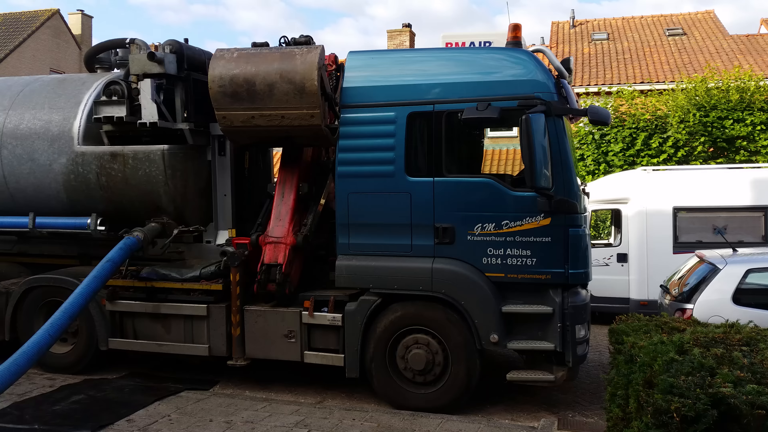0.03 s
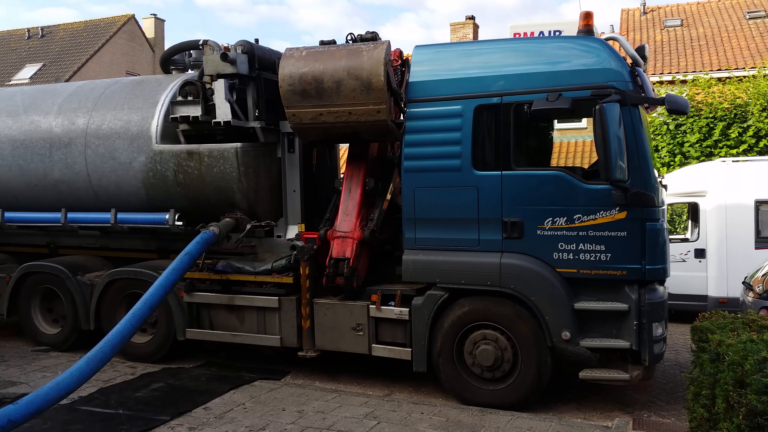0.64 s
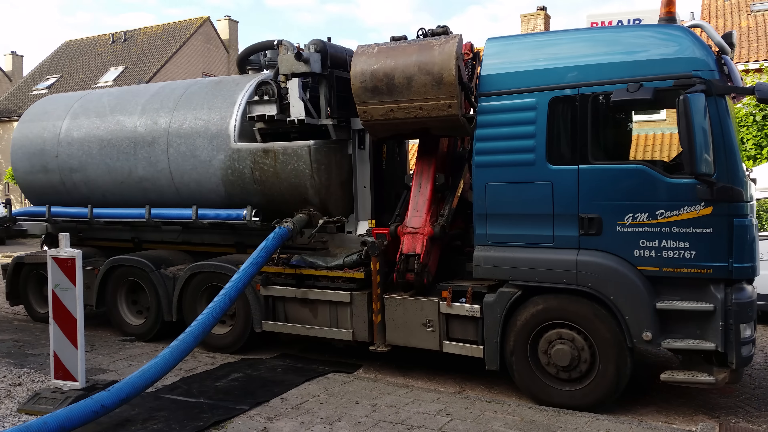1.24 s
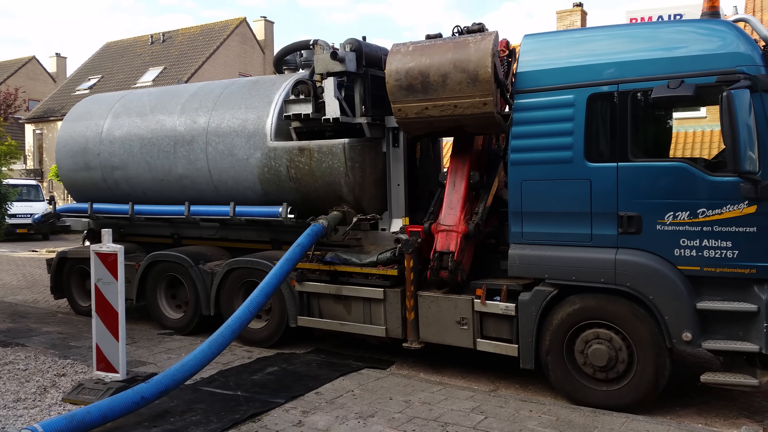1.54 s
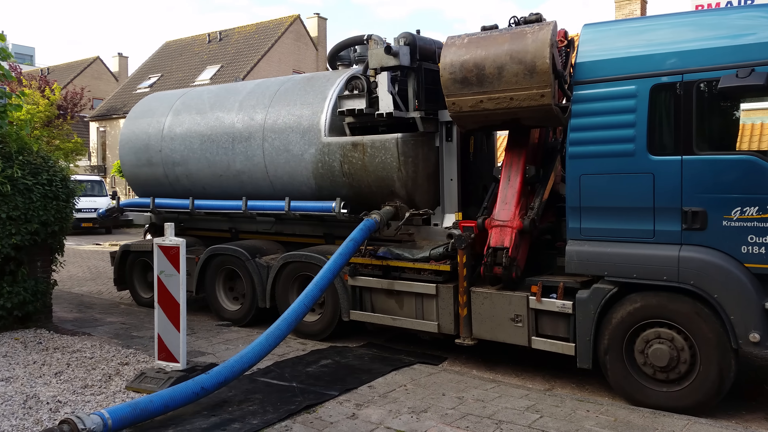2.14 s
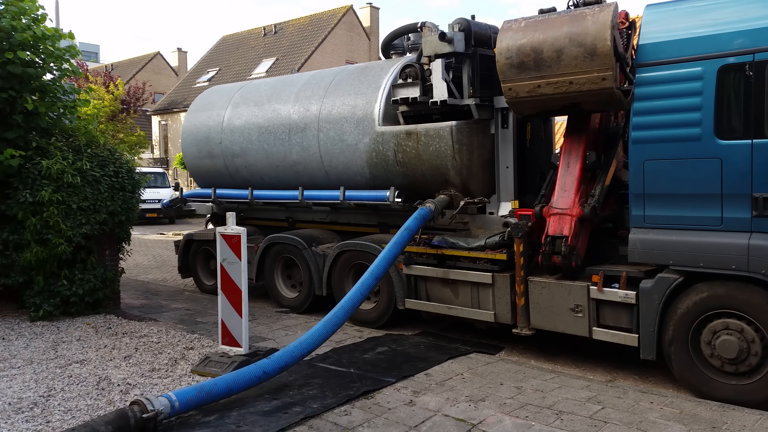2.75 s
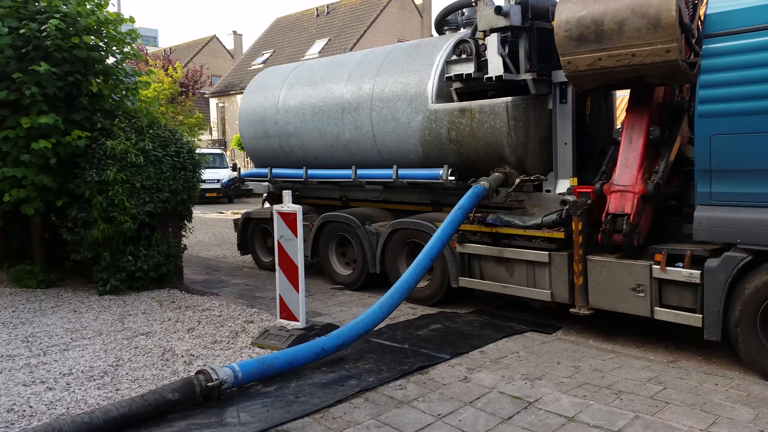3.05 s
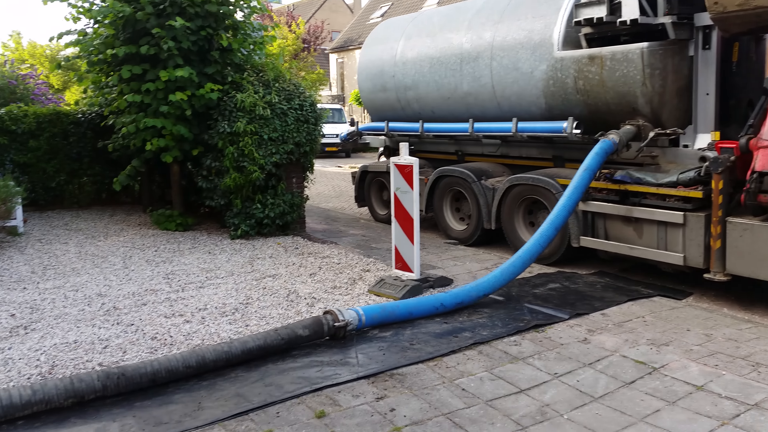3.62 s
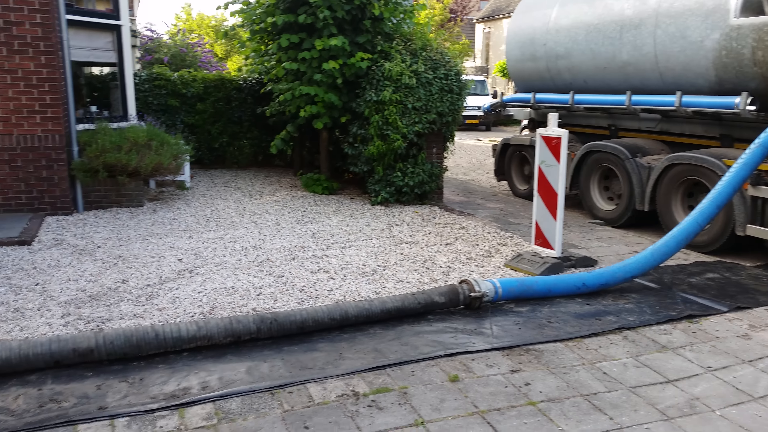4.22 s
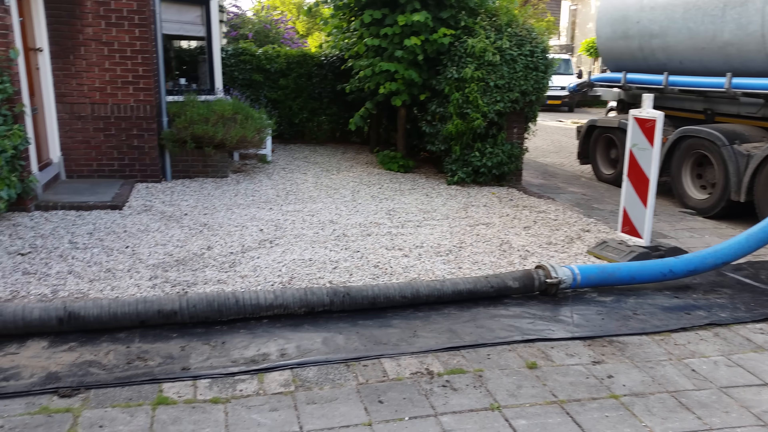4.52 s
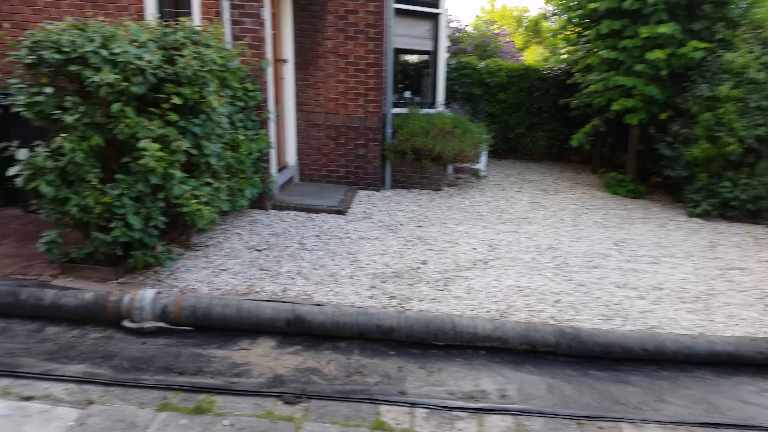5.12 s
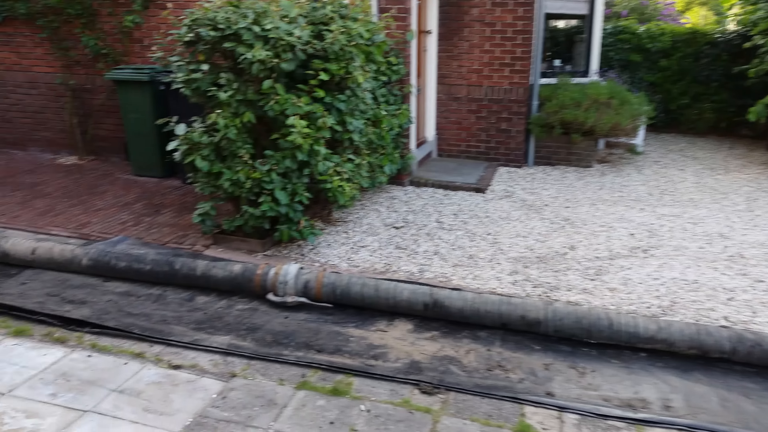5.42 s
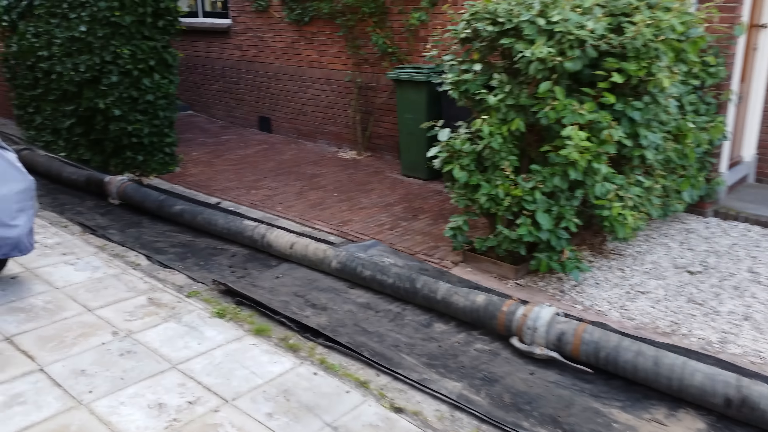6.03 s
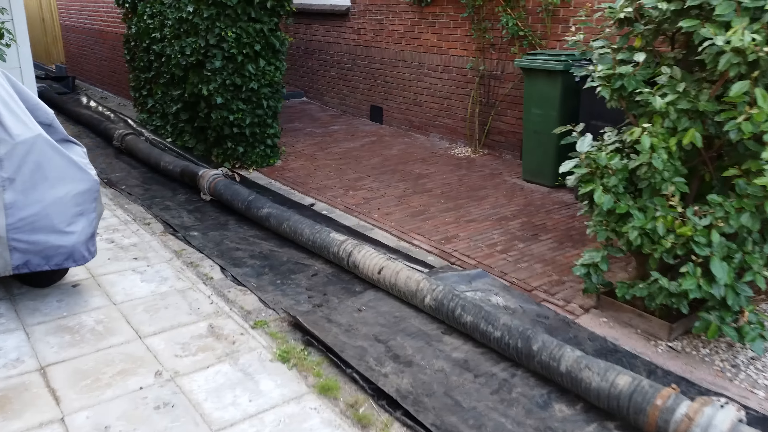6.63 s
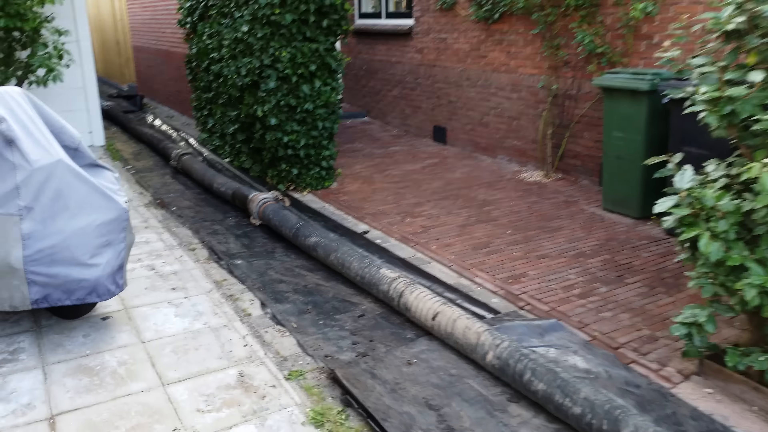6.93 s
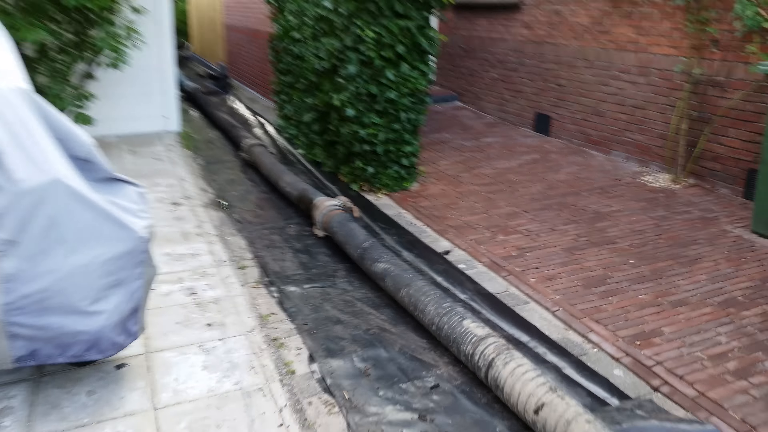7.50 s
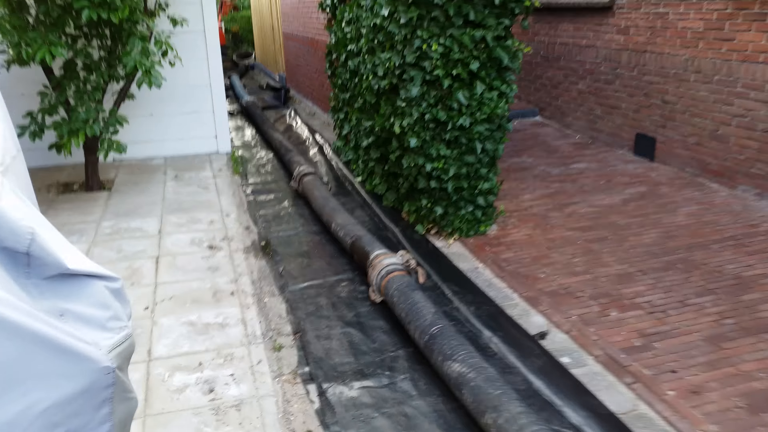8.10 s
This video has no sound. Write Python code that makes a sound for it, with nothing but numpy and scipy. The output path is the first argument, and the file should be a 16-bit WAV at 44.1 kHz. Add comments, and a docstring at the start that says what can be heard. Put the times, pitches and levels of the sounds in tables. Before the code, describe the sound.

A tanker truck's diesel engine and vacuum pump drone steadily in a street, with a throbbing hum, rushing air and faint whine.

```python
"""Vacuum tanker in a brick-lined street

A six-cylinder diesel, governed at working speed, drives a pump. Exhaust and pump radiate harmonics of
their cycles, which beat over a roar of air and clatter; crankshaft and blower whine, and grit hisses
in the suction hose. The listener turns from the truck past a house front to an alley, moving through
the standing waves between the walls, where single tones sink or swell."""
import sys
import numpy as np
from scipy import signal
from scipy.fft import rfft, irfft, next_fast_len
from scipy.io import wavfile
from scipy.ndimage import uniform_filter1d, minimum_filter1d

SR = 44100
rng = np.random.default_rng(int(sys.argv[2]) if len(sys.argv) > 2 else 0)


def unload_audio(sound):
    """Save the sound as a 16-bit wav file, at the path given as the first command line argument."""
    columns = np.transpose(np.atleast_2d(sound))
    # keep every value between -1 and 1, then stretch to whole-number steps
    steps = np.round(np.clip(columns, -1, 1) * 32767)
    wavfile.write(sys.argv[1], SR, steps.astype(np.int16))


N = 364266
T = np.arange(N) / SR

CYLINDERS, WORKING_RPM = 6, 1471.6
PUMP_RATIO, BLOWER_RATIO = 0.98453, 2.05  # turns per crankshaft turn
SOUND_M_PER_S = 343

# where the listener faces: (time [s], place [0 truck, 1 house front, 2 alley])
HEADING = [(3.7, 0), (5.3, 1), (6.1, 1), (6.95, 2)]
# bearing of the truck: (time [s], extra path to the right ear [m], exhaust gain at that ear [dB])
TRUCK_BEARING = [(1.2, .06, .4), (3.5, .06, .4), (5.8, .13, .3), (6.5, .11, .3), (7.1, -.08, 1.4),
                 (8.2, -.06, 1.3)]
# reflection off the paving: (time [s], extra path [m], gain [ratio])
PAVING_ECHO = [(1.1, .727, .26), (2.2, .693, .25), (3.2, .676, .25), (3.7, .648, .36), (4.1, .62, .24),
               (4.5, .535, .15), (5.2, .515, 0)]
# nodes and antinodes along the walk: (time [s], frequency [Hz], half duration [s], gain [dB])
STANDING_WAVES = [(3.85, 74, 0.24, 7), (4.85, 121, 0.33, 3), (5.1, 147, 1.1, -9.5), (6.047, 147, 0.13, -5),
                  (6.1, 221, 0.59, -10), (6.55, 74, 0.38, -26.5), (6.96, 221, 0.19, -22),
                  (7.356, 294, 0.17, -13), (7.798, 221, 0.24, -14), (8.15, 147, .22, -8),
                  (8.2, 97, 1.2, -16), (8.3, 121, 0.31, -15)]
# likeness of the roar at the two ears: (frequency [Hz], coherence [0-1])
EAR_COHERENCE = [(60, 0.54), (150, 0.46), (300, 0.9), (640, 0.75), (1400, 0.27), (3000, 0.1)]
# colour of the right channel against the left: (frequency [Hz], gain [dB])
RIGHT_COLOUR = [(60, -0.2), (200, -2.5), (380, -3.5), (700, -6), (1300, -6.5), (2400, -4.2), (5600, -2.5),
                (6700, -7), (8200, -13.5), (10000, -9.5), (12400, 1), (15000, 1.5)]
# rushes of grit in the hose: (time [s], level [dB], duration [s])
GRIT_RUSHES = [(4.14, -41, .045), (4.21, -42, .02), (4.272, -36, .025), (4.32, -42, .03), (4.635, -42, .05),
               (5.45, -44, .022), (7.475, -42, .025)]
# spectrum of the grains' impacts: (frequency [Hz], relative level [dB])
GRIT_SPECTRUM = [(1500, -30), (4000, -10), (7500, 2), (13000, 1), (16000, -5)]
# spectrum of fan and rushing air: (frequency [Hz], relative level [dB])
ROAR_SPECTRUM = [(20, -80), (40, -52.5), (75, -50), (140, -47.5), (250, -49), (520, -51.5), (850, -52.5),
                 (1400, -55), (2600, -62), (4000, -69), (5600, -76), (7000, -76), (9500, -83), (15500, -88)]
# part of the roar that is engine clatter: (frequency [Hz], share of power [0-1])
CLATTER_FRACTION = [(150, .03), (450, .1), (800, .3), (1500, .55), (2500, .6), (3800, .35), (6000, .05)]
# resonances and hollows of chassis, tank and street:
# (frequency [Hz], width [Hz], gain facing truck [dB], house [dB], alley [dB])
RESONANCES = [(182, 47, -6.5, -10, -2), (226, 40, 11.5, 3, -1.5), (294, 25.5, 12, 9.5, 6.5),
              (367.3, 53, 5, 9.5, 6.5), (456.6, 17.4, 7, 10, 7.5), (582, 27, 5, -3, 2.5),
              (649, 71, 8.5, 3.5, 3.5), (679, 19, -7, -2, -3), (751, 70, 5, 2.5, 0.5),
              (850, 88, -0.5, 6.5, 5.5), (1055, 23, 2, 10.5, 0), (1212, 97, 1, 5.5, 6.5),
              (1514, 70, 3.5, 8, 4.5), (1710, 390, -3.5, -2, -1.5), (1990, 230, 1.5, -2.5, -3),
              (2700, 640, 0.5, 2, 1.5), (3760, 340, 0.5, 1, 2)]
# transmission of the roar: (band centre [Hz], gain facing truck [dB], house [dB], alley [dB])
ROAR_BANDS = [(170, 1, 2.3, 1), (410, -1.6, 1.5, 0.19), (950, -0.17, 0.36, -1.7), (2580, 0.95, 1.1, -1.8),
              (6000, 0.6, 1, -0.77), (12000, .9, .3, -1.8)]
# blower whine: (order [per blower turn], relative level facing truck [dB], house [dB], alley [dB])
BLOWER_HARMONICS = [(7, -41, -41, -40), (8, -42.5, -24.5, -34), (9, -40, -49, -26.5), (13, -32.5, -42, -50),
                    (16, -33, -34, -31), (17, -39, -31, -57)]
# engine ringing: (order [per crankshaft turn], relative level [dB])
CRANK_HARMONICS = [(8, -39), (15, -38), (18, -33.5), (21, -38.5), (22, -39), (24, -39.5), (36, -43),
                   (39, -52), (42, -41.5), (45, -40), (57, -40.5), (60, -41), (63, -45.5), (66, -47.5),
                   (69, -47.5), (72, -45), (78, -46.5)]
# pump throb: (order [per pump turn], level facing truck [dB], house [dB], alley [dB])
PUMP_HARMONICS = [(2, -36.5, -36.5, -33), (4, -29.5, -24, -18.5), (5, -20, -21, -20)]
# exhaust hum: (order [per firing], level facing truck [dB], house [dB], alley [dB])
EXHAUST_HARMONICS = [(1, -39, -23, -16.5), (2, -24.5, -22.5, -22.5), (3, -18.2, -16.5, -18),
                     (4, -18.5, -16.5, -20.5)]


def amp(db):
    """Amplitude grows tenfold for every 20 dB."""
    return 10 ** (np.asarray(db) / 20)


def unit(x):
    """Normalisation to rms 1."""
    return x / np.sqrt(np.mean(abs(x) ** 2) + 1e-20)


def spectrum(points, hz):
    """Interpolation of (frequency, value) points on a logarithmic frequency axis."""
    frequency, value = np.transpose(points)
    return np.interp(np.log(hz + 1), np.log(frequency), value)


def curves(rows):
    """Linear interpolation in time of each column after the first."""
    times, *columns = np.transpose(rows)
    return [np.interp(T, times, column) for column in columns]


def shape(x, gain):
    """Zero-phase filtering: the spectrum is multiplied by gain(frequency)."""
    size = next_fast_len(N + 2048)
    return irfft(rfft(x, size) * gain(np.fft.rfftfreq(size, 1 / SR)), size)[..., :N]


def drift(rate_hz):
    """Random fluctuation of rms 1: noise low-passed near the given rate."""
    hz = np.fft.rfftfreq(4096, N / SR / 4000)
    slow = irfft(rfft(rng.standard_normal(4096)) * np.exp(-(hz / rate_hz) ** 2))
    return unit(np.interp(T, np.linspace(0, T[-1], len(slow)), slow))


def delayed(x, path_m):
    """Propagation delay: extra path divided by the speed of sound."""
    return np.interp(T - path_m / SOUND_M_PER_S, T, x)


def facing():
    """Linear crossfade: the weights of truck, house and alley as the listener turns."""
    place = curves(HEADING)[0]
    return np.array([np.maximum(1 - abs(place - k), 0) for k in range(3)])


def transmission_db(corner_s=7.6, half_s=0.23, shadow_db=-1.4):
    """Acoustic shadow: each band's gain follows the heading and dips behind a house corner."""
    shadow = shadow_db * np.exp(-((T - corner_s) / half_s) ** 2)
    return np.array(ROAR_BANDS)[:, 1:] @ facing() + shadow


def standing_wave_gain(tone_hz):
    """Standing waves: a tone sinks at its nodes and swells at its antinodes."""
    gain = np.ones(N)
    for at_s, hz, half_s, db in STANDING_WAVES:
        if abs(np.log2(hz / tone_hz)) < 0.1:  # within a tenth of an octave
            away = np.tanh((T - at_s) / half_s) ** 2
            gain *= np.sqrt(away + (1 - away) * amp(db) ** 2)
    return gain


def ground_reflection(x):
    """Comb filtering: the direct sound interferes with an echo off the paving, whose path changes."""
    path_m, gain = curves(PAVING_ECHO)
    return x + gain * np.array([delayed(ear, path_m) for ear in x])


def wall_reflections(x, echo_gain=0.16, sway_m=0.06, count=5):
    """Interference: faint echoes off truck and walls make peaks that slide as the listener sways."""
    # bass diffracts round the walls and treble scatters off brick and hedges
    mids = shape(x, lambda hz: hz ** 4 / (hz ** 4 + 800 ** 4) / (1 + (hz / 3800) ** 4))
    paths_m = rng.uniform(.9, 3, (2, count))
    echoes = [sum(delayed(ear, path + sway_m * drift(0.45)) for path in paths)
              for ear, paths in zip(mids, paths_m)]
    return x + echo_gain * np.array(echoes)


def two_ears(left, independent):
    """Partial coherence: the ears share much of the low range, slightly delayed, but little treble."""
    coherence = lambda hz: spectrum(EAR_COHERENCE, hz)
    shared = delayed(shape(left, coherence), curves(TRUCK_BEARING)[0])
    diffuse = shape(independent, lambda hz: np.sqrt(1 - coherence(hz) ** 2))
    return np.array([left, shared + diffuse])


def hose_grit(grains_per_s=2200, trickle_db=-58.5, alley_db=-4, clump_db=1.0):
    """Shot noise: sand and stones strike the hose at random, in a trickle with brief rushes."""
    trickle = amp(trickle_db + alley_db * facing()[-1] - clump_db * drift(12)) ** 2
    rushes = sum(amp(db) ** 2 * np.exp(-(2 * (T - at_s) / length_s) ** 2)
                 for at_s, db, length_s in GRIT_RUSHES)
    impacts = rng.standard_normal((2, N)) * (rng.random(N) < grains_per_s / SR)
    hiss = unit(shape(impacts, lambda hz: amp(spectrum(GRIT_SPECTRUM, hz))))
    return np.sqrt(trickle + rushes) * hiss


def tone(cycles, db):
    """Interaural delay: a sinusoid reaches the nearer ear first."""
    both = np.array([cycles, delayed(cycles, curves(TRUCK_BEARING)[0])])
    return np.sqrt(2) * amp(db) * np.sin(2 * np.pi * both)


def whine(cycles, db, fade_db, waver_cycles):
    """Multipath fading: a high harmonic swells and fades differently at each ear."""
    swell_db = fade_db * np.tanh(drift(1.8) + np.array([drift(1.9), drift(8.9)]))
    return tone(cycles + rng.random() + waver_cycles * drift(7.2), db + swell_db)


def blower_whine(turns, gain_db=-3.5):
    """Rotational tones: the belt-driven blower sounds at multiples of its shaft rate."""
    return sum(whine(order * turns, place_db @ facing() + gain_db, fade_db=6.5, waver_cycles=0.09)
               for order, *place_db in BLOWER_HARMONICS)


def crank_ringing(crank, gain_db=-2):
    """Forced vibration: the engine rings at high multiples of the crankshaft rate."""
    midband_db = transmission_db()[2]
    return sum(whine(order * crank, db + gain_db + midband_db, fade_db=8.5, waver_cycles=0.13)
               for order, db in CRANK_HARMONICS)


def clatter(cycle, alike=0.28, rattle_samples=600, spots=12):
    """Cyclostationary noise: each cylinder repeats its own rattle, partly like the others'."""
    common = rng.standard_normal((spots, 2, rattle_samples))
    own = rng.standard_normal((spots, 2, rattle_samples * CYLINDERS))
    rattles = np.sqrt(alike) * np.tile(common, CYLINDERS) + np.sqrt(1 - alike) * own
    sample = (cycle % 1 * rattle_samples * CYLINDERS).astype(int)
    # the echoes change along the walk, so one spot's pattern fades into the next
    spot, progress = np.divmod(np.arange(N) * (spots - 1) / N, 1)
    here = rattles[spot.astype(int), :, sample].T
    ahead = rattles[spot.astype(int) + 1, :, sample].T
    return here * np.cos(np.pi / 2 * progress) + ahead * np.sin(np.pi / 2 * progress)


def resonate(x):
    """Resonance: chassis, tank and street colour the roar's spectrum differently at each place."""
    grid_hz = np.geomspace(10, SR / 2, num=2000)
    centre_hz, width_hz, *places = np.transpose(RESONANCES)
    bells = 1 / (1 + (2 * (grid_hz[:, None] - centre_hz) / width_hz) ** 4)
    gains = [amp(spectrum(ROAR_SPECTRUM, grid_hz) + bells @ db) for db in places]
    return sum(share * shape(x, lambda hz: np.interp(hz, grid_hz, gain))
               for share, gain in zip(facing(), gains))


def throb_db(crank, knock_db=0.33, puff_db=1.25, rotor_hz=9.85, rotor_db=0.35, flutter_db=0.5):
    """Amplitude modulation: the engine and a slow pump rotor pulse the roar's bands, listed low to high."""
    cycle = crank / 2
    knock = knock_db * (np.cos(2 * np.pi * crank) + np.cos(2 * np.pi * CYLINDERS * cycle))
    # the rotor lifts the treble once a turn and the mids twice
    angle = 2 * np.pi * (rotor_hz * T - 0.3)
    rotor = -rotor_db * np.cos(angle)
    flutter = flutter_db * np.cos(2 * angle) + 0.78 * drift(32)
    # once a cycle the hiss jumps up and ebbs away
    puff = puff_db * (1 - 2 * ((cycle - 0.6) % 1)) + 0.82 * drift(19)
    mids, treble = knock + flutter, rotor + puff
    return [0, flutter, mids, mids + rotor + 0.36 * puff, treble, treble]


def roar(crank, swell_db=0.21):
    """Source and filter: rushing air and clatter excite the resonances, reflect and throb."""
    share = lambda hz: spectrum(CLATTER_FRACTION, hz)
    air = shape(rng.standard_normal((2, N)), lambda hz: np.sqrt(1 - share(hz)))
    rattle = shape(clatter(crank / 2), lambda hz: np.sqrt(share(hz)))
    excitation = two_ears(*(air + rattle)) * np.sqrt(SR / 2)  # unit power per hertz
    street = wall_reflections(ground_reflection(resonate(excitation)))
    log_centres = np.log([row[0] for row in ROAR_BANDS])
    bands = [shape(street, lambda hz: np.interp(np.log(hz + 1), log_centres, weights))
             for weights in np.eye(len(ROAR_BANDS))]
    throbbing = sum(amp(db + throb) * band
                    for db, throb, band in zip(transmission_db(), throb_db(crank), bands))
    return amp(-swell_db * drift(2.8)) * throbbing


def hum(cycles, harmonics, flutter, waver_cycles):
    """Harmonics of nearly periodic strokes waver in level and phase, and stand between the walls."""
    out = np.zeros((2, N))
    for order, *place_db in harmonics:
        phase = order * cycles
        partial = tone(phase + rng.random() + waver_cycles * drift(6.2), place_db @ facing())
        mean_hz = phase[-1] / T[-1]
        out += partial * standing_wave_gain(mean_hz) * (1 + flutter * drift(26))
    return out


def pump_hum(turns):
    """Pulsating flow: the pump's suction sounds at low multiples of its shaft rate."""
    return hum(turns, PUMP_HARMONICS, flutter=0.055, waver_cycles=0.0099)


def exhaust_hum(crank):
    """Periodic gas pulses give harmonics of the firing rate; each cylinder fires once in two turns."""
    exhaust = hum(CYLINDERS / 2 * crank, EXHAUST_HARMONICS, flutter=0.07, waver_cycles=0.0078)
    exhaust[1] *= amp(curves(TRUCK_BEARING)[1])
    return exhaust


def crankshaft(hunt_rpm=2.3, period_s=1.0, fastest_s=1.15):
    """Governor hunting: the speed swings gently about its mean; its integral counts the turns."""
    rpm = WORKING_RPM + hunt_rpm * np.cos(2 * np.pi * (T - fastest_s) / period_s)
    return np.cumsum(rpm) / 60 / SR


def scene():
    """Superposition: the sources timed by one crankshaft add to the grit in the hose."""
    crank = crankshaft()
    hums = exhaust_hum(crank) + pump_hum(PUMP_RATIO * crank)
    whines = crank_ringing(crank) + blower_whine(BLOWER_RATIO * crank)
    return hums + whines + roar(crank) + hose_grit()


def record(dry, start_s=0.84, fade_s=0.29, ceiling=0.94, cutoff_hz=15800):
    """Filtering and gain: the right channel is coloured; both fade in, are limited and low-passed."""
    right = shape(dry[1], lambda hz: amp(spectrum(RIGHT_COLOUR, hz)))
    faded = np.array([dry[0], right]) * np.clip((T - start_s) / fade_s, 0, 1)
    safe_gain = np.minimum(1, ceiling / (abs(faded).max(axis=0) + 1e-9))
    limited = faded * uniform_filter1d(minimum_filter1d(safe_gain, size=201), size=201)
    lowpass = signal.firwin(1023, cutoff_hz, window=("kaiser", 9), fs=SR)
    return signal.oaconvolve(limited, lowpass[None], "same")


dry = scene()
out = record(dry)
unload_audio(out)
```